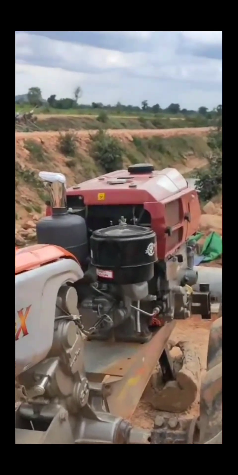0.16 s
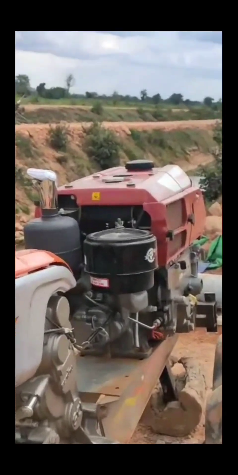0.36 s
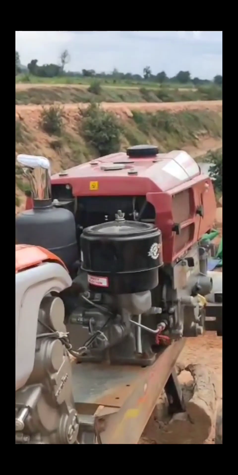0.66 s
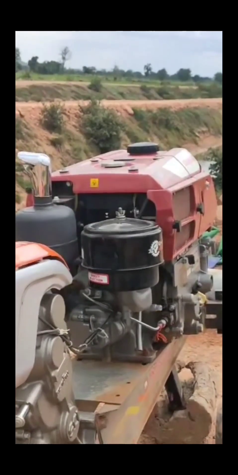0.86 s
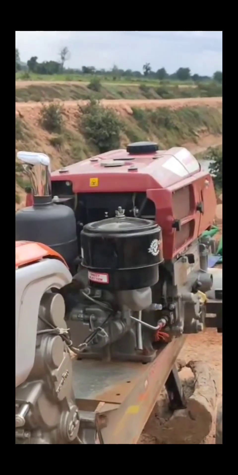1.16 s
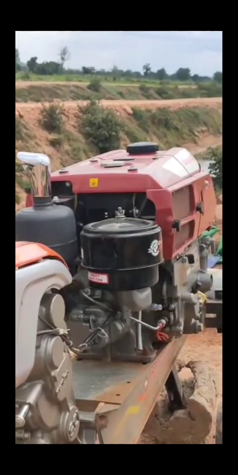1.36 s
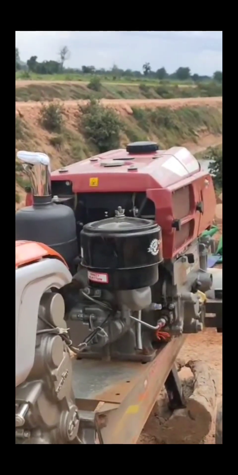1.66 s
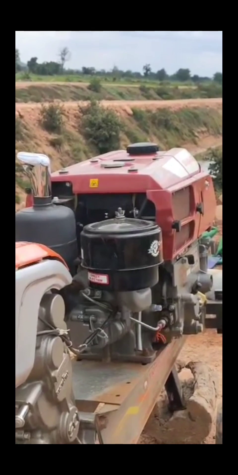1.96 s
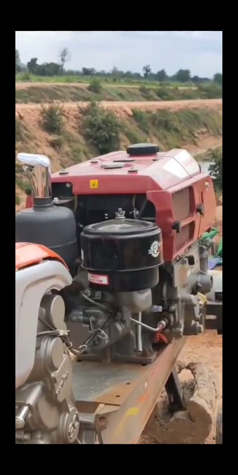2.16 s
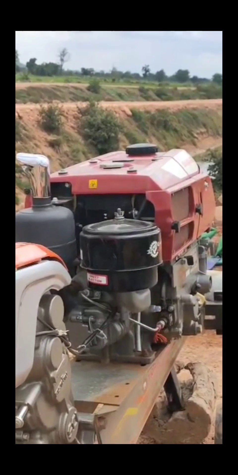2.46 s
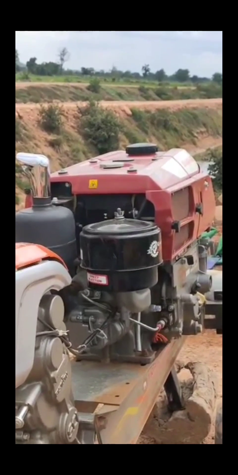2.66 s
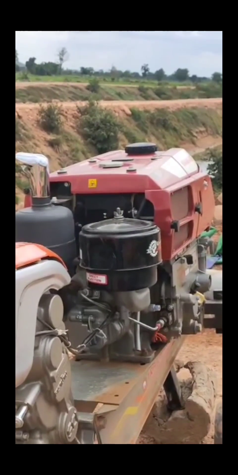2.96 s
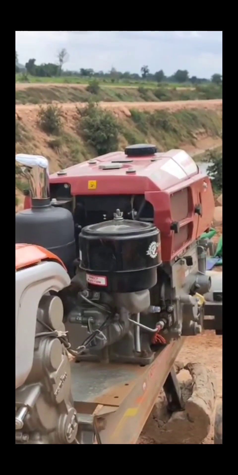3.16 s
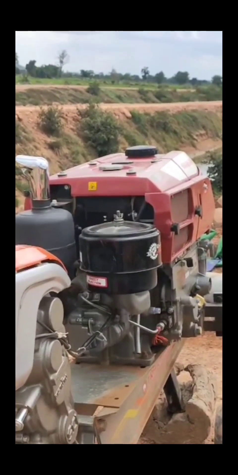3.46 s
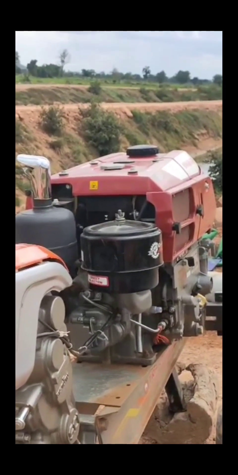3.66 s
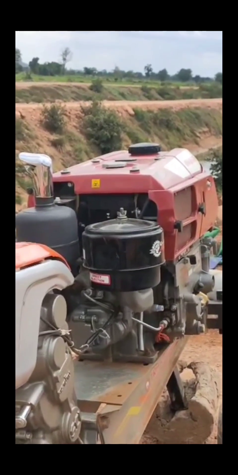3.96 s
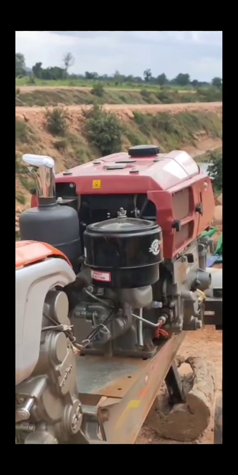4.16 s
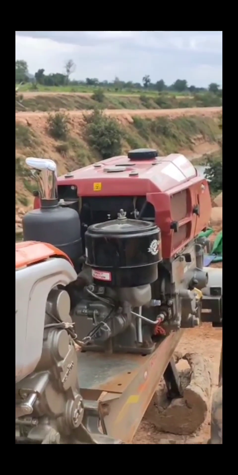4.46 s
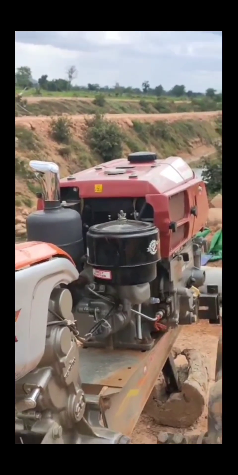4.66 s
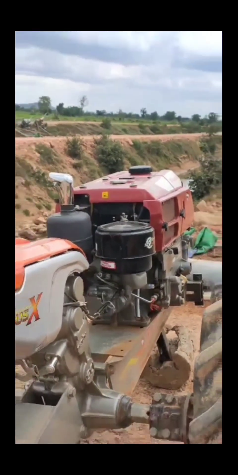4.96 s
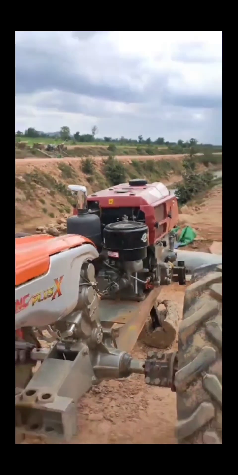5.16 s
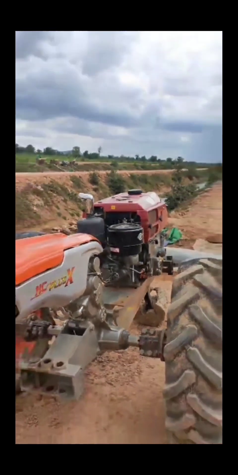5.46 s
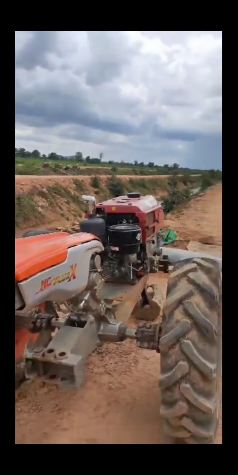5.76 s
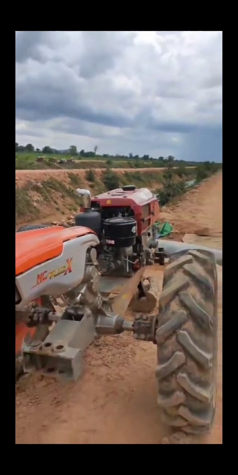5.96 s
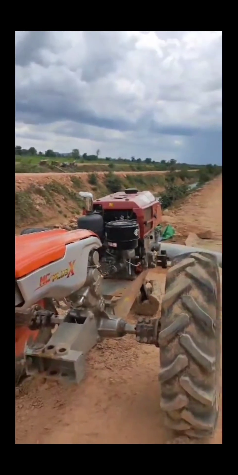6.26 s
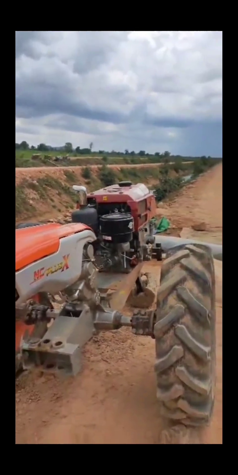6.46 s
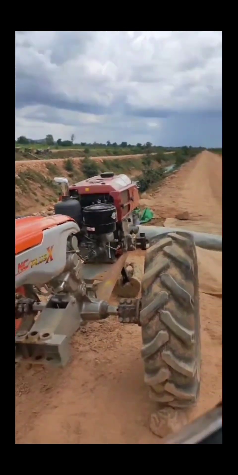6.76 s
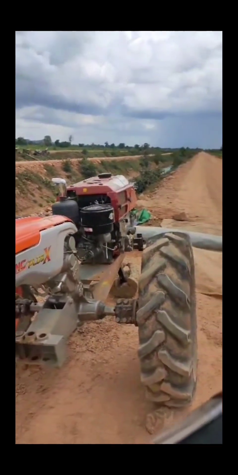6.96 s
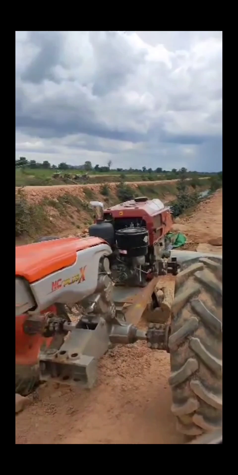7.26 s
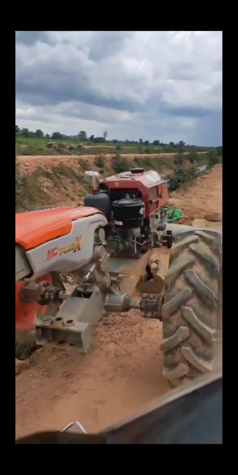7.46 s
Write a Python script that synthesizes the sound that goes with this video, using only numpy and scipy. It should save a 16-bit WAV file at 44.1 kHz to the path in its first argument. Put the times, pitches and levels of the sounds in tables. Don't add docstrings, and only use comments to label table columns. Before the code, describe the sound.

A one-cylinder diesel engine knocks steadily and fast outdoors, its metallic clatter and dull exhaust puffs heard close by, duller and boxier near the end.

```python
import sys
import numpy as np
from scipy import signal
from scipy.fft import rfft, irfft, next_fast_len
from scipy.io import wavfile

SR = 44100
rng = np.random.default_rng(int(sys.argv[2]) if len(sys.argv) > 2 else 0)


def to_wav(s):
    ch = np.atleast_2d(s).T
    pcm = np.round(np.clip(ch, -1, 1) * 32767)
    wavfile.write(sys.argv[1], SR, pcm.astype(np.int16))


def magnitude_from_level(level_db):
    exponent = np.asarray(level_db, float) / 20
    return 10 ** exponent


N = 335601
HZ = np.fft.rfftfreq(next_fast_len(N + SR), 1 / SR)

# pitch_hz, width_hz, level_db
CRANKCASE_TONES = [(163, 35, -18), (247.7, 50, -20), (322, 22, -19), (435.5, 30, -2), (468.9, 76, 1.5),
                   (518.5, 37, -4.5), (553, 75, -17), (646, 31, -7.5)]
BLOCK_TONES = [(866, 83, -9.5), (969.5, 75, -10.5), (1057, 96, -10), (1118, 48.3, -5.5), (1251, 108, -1.5),
               (1400, 64, -4), (1514.4, 57, -8), (1582, 55, -12.5)]
HEAD_TONES = [(1817, 130, -0.5), (2020, 155, 0.5), (2127, 180, -5), (2676, 250, -18)]
COVER_TONES = [(2875, 216, -1), (2940, 54, -4), (3060, 80, 0), (3230, 31, -23), (3650, 53, -9.5)]
# pitch_hz, width_hz, level_db
SEAT_TONES = [(2660, 660, -5.5), (3440, 300, -14), (3870, 610, -3.5), (5500, 2000, -12.5),
              (6100, 290, -8.5), (7450, 220, -8.5), (7570, 1300, -12), (7860, 250, -3.5),
              (9900, 1600, -14.5), (12500, 2000, -8)]
SCRAPE_TONES = [(3080, 3130, 0.5), (4580, 1100, 2), (6160, 1800, -10.5), (8150, 350, -12),
                (11200, 6900, -20)]
GEAR_TONES = [(127, 31, -10), (166.2, 18, 0.5), (255.5, 26, -4), (403.5, 66, -2), (626, 220, -10),
              (880, 110, -6.5), (1170, 250, -5.5), (1473, 430, -10.5), (2297, 220, -17.5), (2900, 210, -21),
              (4130, 610, -22.5), (7000, 4400, -31)]
# pitch_hz, width_hz, level_db
PIPE_TONES = [(118, 42, 0), (164.3, 32, -1), (227, 90, -10), (409, 90, -1.5)]
SILENCER_TONES = [(248.5, 54.5, -2)]

# after_firing_ms, length_ms, level_db
STROKES = [
    (40, 37.4, -44.5),
    (78.7, 31.4, -40),
    (113, 12, -57.5),
]
# after_firing_ms, level_db
PUFFS = [(6, -50), (52, -50.5), (76, -49), (120, -47)]
# after_firing_ms, level_db
SILENCER_BLOWS = [(-2.5, -11), (9.5, -11.5), (34.5, -15.5), (65.5, -20), (98, -24.5)]
# after_firing_ms, level_db, pitch_hz, width_hz
TAPPETS = [
    (70.6, -44.5, 1900, 1000),
    (88.6, -53.5, 4600, 5000),
    (113.5, -49, 3000, 300),
]
# start_s, level_db, pitch_hz, width_hz, length_ms
LOOSE_TICKS = [
    (6.753, -40.5, 10300, 9000, 22),
    (6.785, -39, 12400, 3500, 87),
    (7.354, -48.5, 2900, 115, 4.7),
    (7.433, -41.5, 2810, 104.5, 49),
    (7.487, -56, 6000, 7000, 1.5),
    (7.047, -34, 1210, 102, 53),
    (7.295, -43.5, 9300, 9000, 4.4),
    (7.422, -43.5, 10330, 5000, 77),
]

# time_s, treble_gain_db
GRIP = [
    (0, 0),
    (6.745, 0),
    (6.77, 12),
    (7.61, 12),
]
# pitch_hz, gain_db
PHONE_TONE = [(30, -42), (90, -30.5), (115, -11.5), (200, -0.5), (3400, 3), (4200, -11.5), (5000, -13.5),
              (6200, -15.5), (8000, -19), (8400, -19), (10000, -26), (14000, -37.5)]
# time_s, extra_distance_m
STEP_BACK = [
    (0, 0),
    (1.5, .3),
    (2.9, -.15),
    (4.3, .35),
    (6.2, .95),
    (7.61, .4),
]
# time_s, hidden_share_0_to_1
BEHIND = [
    (0, 0.1),
    (4.6, 0.16),
    (5.6, 0.38),
    (6.3, 1),
    (6.95, 1),
    (7.61, 0.9),
]
# time_s, charge_db
LOAD = [(0, 2), (1.4, 1), (2.6, -1), (4.2, 0), (5.6, -1), (7.61, 1)]
# start_s, charge_db, cover_ring_db, valve_seat_db
ODD_FIRINGS = [(.045, 1, -0.5, 9), (.198, -3, -6.5, -2.5), (.352, -1, -3, 10.5), (.506, 0.5, 1, 13.5),
               (.659, 1, 5, -2), (.966, 1, 7.5, 10.5), (1.12, -1.5, 2, 7.5), (1.427, 2.5, 5, 15.5),
               (1.735, -2, -3, -9), (1.888, -0.5, 3.5, 14), (2.195, 2.5, 0.5, -4), (2.349, 1.5, 3, 11),
               (2.503, 1, 1.5, 15), (2.656, -0.5, -11, -10), (3.424, 1.5, 8, 13), (3.732, 1, 1.5, 6),
               (4.039, -1, -4.5, 9.5), (4.192, -1, 4, 12.5), (4.346, 0.5, 6.5, 11), (4.653, 2.5, 3, 23),
               (4.807, -2.5, -0.5, 3), (4.961, 2.5, 7, 12), (6.19, 1.5, 9, 2), (6.343, -1, 2.5, 11),
               (6.651, 1.5, 5.5, 15), (6.958, 1.5, -2, 20.5), (3.578, 1.5, -3, 0), (5.115, 1.5, -2, -10),
               (7.265, -1.5, -11, 4), (7.573, 0.5, 8, -15)]

# mean_db, scatter_db, follows_charge_db_per_db, behind_tractor_db
KNOCK, SLAP, CASE = (-23, 0.67, 1, 5.5), (-22, 2.5, 1, -1), (-29.5, .5, 1, -0.5)
HEAD_HIT, COVER_HIT = (-34, 3, 0.55, -8), (-40.5, 3.5, -0.5, -5.5)
SEAT_TICK, SEAT_THUD = (-59, 2.5, 0.34, -1), (-43.5, 2, -0.5, 6)

FIRST_S, CYCLE_S, CYCLE_JITTER_MS = .0437, .15362, .3
SLAP_S, VALVE_S = .0125, .0385
CASE_LAG_S = .0007
CASE_LEAD_S, BLOCK_LEAD_S = 0.00394, 0.001492


def ring(x, modes, order=1):
    shape = 0
    for k, (hz, width, db) in enumerate(modes):
        tone = 1j * HZ * width / (hz * hz - HZ * HZ + 1j * HZ * width)
        sign = (-1) ** (k * order)
        shape = shape + sign * magnitude_from_level(db) * tone ** order
    return irfft(rfft(x, 2 * len(HZ) - 2) * shape)[:N]


def colour(x, points):
    hz, db = np.transpose(points)
    gain = magnitude_from_level(np.interp(np.log(HZ + 1), np.log(hz), db))
    cep = irfft(np.log(gain))
    cep[1:len(HZ)] *= 2
    cep[len(HZ):] = 0
    return irfft(rfft(x, len(cep)) * np.exp(rfft(cep)))[:N]


def blows(times, db, ms, clean, rise=0.4):
    u = np.arange(4000) / (SR * max(ms, .2) / 1000)
    shape = np.minimum(u / np.clip(rise, .02, 1), 1) ** 2
    shape = shape * np.exp(-8 * np.maximum(u - rise, 0) ** 2)
    share = np.clip(clean, 0, 1)
    ragged = np.sqrt((1 - share) / np.sum(shape ** 2))
    push = rng.standard_normal((len(times), len(u))) * shape * ragged
    push[:, 0] += np.sqrt(share)
    out = np.zeros(N + 2 * SR)
    for t, gain, one in zip(times, magnitude_from_level(db + np.zeros(len(times))), push):
        i = int((t + .5) * SR)
        out[i:i + len(u)] += gain * np.sqrt(SR / 100) * one
    return out[SR // 2:SR // 2 + N]


def along(curve, s):
    return np.interp(s, *np.transpose(curve))


def firings():
    beat = FIRST_S + CYCLE_S * np.arange(-1, N / SR / CYCLE_S)
    travel = along(STEP_BACK, beat) / 343
    s = beat + travel + CYCLE_JITTER_MS / 1000 * rng.standard_normal(len(beat))
    odd = np.zeros((len(s), 3))
    which = np.rint((np.transpose(ODD_FIRINGS)[0] - FIRST_S) / CYCLE_S).astype(int) + 1
    odd[which] = np.array(ODD_FIRINGS)[:, 1:]
    return s, odd[:, 0] + along(LOAD, s), odd[:, 1], odd[:, 2]


def strength(rule, s, charge_db):
    mean_db, scatter_db, follows, behind_db = rule
    level_db = mean_db + scatter_db * rng.standard_normal(len(s))
    return level_db + follows * charge_db + behind_db * along(BEHIND, s)


def breeze():
    return magnitude_from_level(-70.5) * ring(rng.standard_normal(N), [(85, 91, 23.5), (8000, 9800, -12)])


def clatter(fired, charge_db):
    def scatter(db):
        return db * rng.standard_normal(len(fired))

    swell = magnitude_from_level(-28) * rng.standard_normal(N)
    for after, ms, db in STROKES:
        swell = swell + blows(fired + after / 1000, db + 18 + scatter(1.5), ms, clean=0)
    puffs = boom = taps = 0
    for after, db in PUFFS:
        puffs = puffs + blows(fired + after / 1000, db + 24.5 + scatter(1.9), ms=11, clean=0.7)
    for after, db in SILENCER_BLOWS:
        blow_db = db + 0.36 * charge_db + scatter(1.6)
        boom = boom + blows(fired + after / 1000, blow_db, ms=15.6, clean=0.66)
    for after, db, hz, width in TAPPETS:
        tap = blows(fired + after / 1000, db + scatter(2), ms=14, clean=.05)
        taps = taps + ring(tap, [(hz, width, 0)])
    grain_db = 1.3 * np.minimum(rng.exponential(size=N // 120 + 1), 3.5)
    grain = magnitude_from_level(grain_db).repeat(120)[:N] / 0.86
    gears = ring(swell * grain, GEAR_TONES)
    return gears + ring(puffs, PIPE_TONES, order=2) + ring(boom, SILENCER_TONES, order=2) + taps


def knock(s, charge_db, rings_db):
    knock_db = strength(KNOCK, s, charge_db)
    slap_db = strength(SLAP, s, charge_db)
    case_db = strength(CASE, s, charge_db)
    head_db = strength(HEAD_HIT, s, charge_db)
    cover_db = strength(COVER_HIT, s, charge_db) + rings_db
    slap = s + SLAP_S + .00015 * rng.standard_normal(len(s))
    spray = blows(s - .009, knock_db + 7.5, ms=10, clean=0.094, rise=.6)
    flame = blows(s - .0054, knock_db + 7.5, ms=6, clean=0.46)
    rattle = spray + blows(s + .008, slap_db + 8, ms=54.5, clean=0, rise=0.12)

    case = blows(s - CASE_LEAD_S, case_db + 25.5, ms=10.6, clean=0.73)
    case += blows(slap + CASE_LAG_S - CASE_LEAD_S, case_db + 23.5, ms=17.6, clean=0.89)
    case += magnitude_from_level(-0.5) * rattle
    block = blows(s - BLOCK_LEAD_S, knock_db + 23, ms=6.1, clean=0.91)
    block += blows(slap - BLOCK_LEAD_S, slap_db + 18.5, ms=7.5, clean=0.69)
    block += rattle + flame
    head = blows(s - .002, head_db + 19.5, ms=13, clean=0.56)
    head += blows(s + 0.0062, head_db + 14.5, ms=21.2, clean=0.51)
    head += magnitude_from_level(-12.5) * (rattle + flame)
    cover = blows(s - .001, cover_db + 20.5, ms=12.6, clean=0.5)
    cover += blows(slap - .002, cover_db + 22, ms=16, clean=0.36)
    cover += magnitude_from_level(-27) * rattle

    low = ring(case, CRANKCASE_TONES, order=2) + ring(block, BLOCK_TONES, order=2)
    return low + ring(head, HEAD_TONES, order=2) + ring(cover, COVER_TONES, order=2)


def valve(fired, charge_db, seats_db):
    s = fired + VALVE_S + 0.0022 * rng.standard_normal(len(fired))
    scrape = blows(fired - .006, 1.1 * charge_db - 32, ms=82, clean=0, rise=0.056)
    scrape += blows(fired + SLAP_S, .7 * charge_db - 40, ms=6.8, clean=.1)
    scrape += blows(fired - .003, .7 * charge_db - 44.5, ms=7.3, clean=0.17)
    tick_db = strength(SEAT_TICK, s, charge_db) + .25 * seats_db + 31.5
    tick = blows(s - .010, tick_db, ms=34.0, clean=0, rise=0.2)
    thud_db = strength(SEAT_THUD, s, charge_db) + seats_db + 19
    thud = blows(s - .008, thud_db, ms=8.2, clean=0.3)
    body = blows(fired + 0.025, -11.5 + .6 * charge_db, ms=26.2, clean=0.7, rise=0.15)
    bright = ring(scrape, SCRAPE_TONES) + ring(tick, SEAT_TONES) + magnitude_from_level(-2) * ring(tick, HEAD_TONES)
    return bright + ring(thud, BLOCK_TONES, order=2) + ring(body, CRANKCASE_TONES, order=2)


def echo(engine):
    fade = magnitude_from_level(-60 * np.arange(SR // 4) / SR / 0.033)
    tail = fade * rng.standard_normal(SR // 4)
    return magnitude_from_level(-46) * signal.fftconvolve(engine, tail)[:N]


def loose_ticks():
    out = np.zeros(N)
    for s, db, hz, width, ms in LOOSE_TICKS:
        even_db = 10 * np.log10(SR / 3 / width)
        push = blows([s], db + even_db, ms, clean=0, rise=0.48)
        out += ring(push, [(hz, width, 0)])
    return out


def scene():
    s, charge_db, rings_db, seats_db = firings()
    engine = clatter(s, charge_db) + knock(s, charge_db, rings_db) + valve(s, charge_db, seats_db)
    return (breeze() + engine + echo(engine) + loose_ticks())[None]


def lift(x, db, hz, width):
    return x + (magnitude_from_level(db) - 1) * ring(x, [(hz, width, 0)])


def band_limit(x):
    return signal.sosfilt(signal.butter(12, 14200, fs=SR, output="sos"), x)


def record(dry):
    t = np.arange(N) / SR
    grip_db, behind = along(GRIP, t), along(BEHIND, t)
    heard = colour(dry[0], PHONE_TONE)
    heard = lift(heard, grip_db, 7770, 1500)
    heard = lift(heard, 1.2 - 5.7 * behind, 2250, 1100)
    heard = lift(heard, -3.0 * behind, 780, 300)
    heard = lift(heard, 3.5 * behind, 1680, 160)
    heard = lift(heard, .25 * grip_db, 6700, 500)
    thump = ring(heard ** 2, [(61.6, 89, 0.0091)])
    hiss = magnitude_from_level(-89.5) * rng.standard_normal(N)
    heard = heard + magnitude_from_level(-17.0 - 8 * behind) * thump + hiss
    return band_limit(heard[None])


dry = scene()
out = record(dry)
to_wav(out)
```